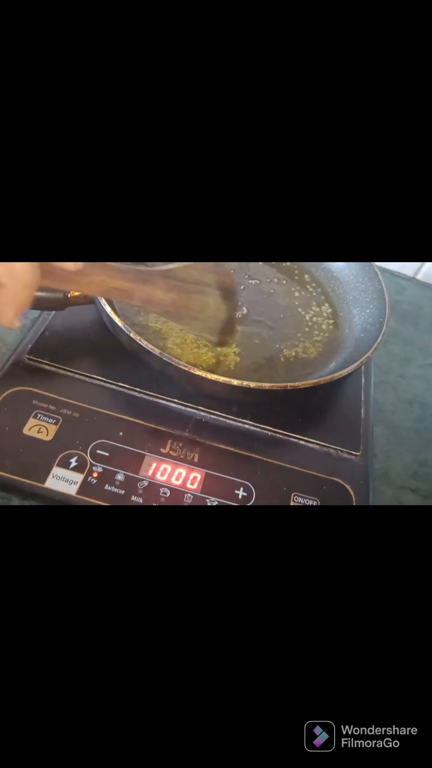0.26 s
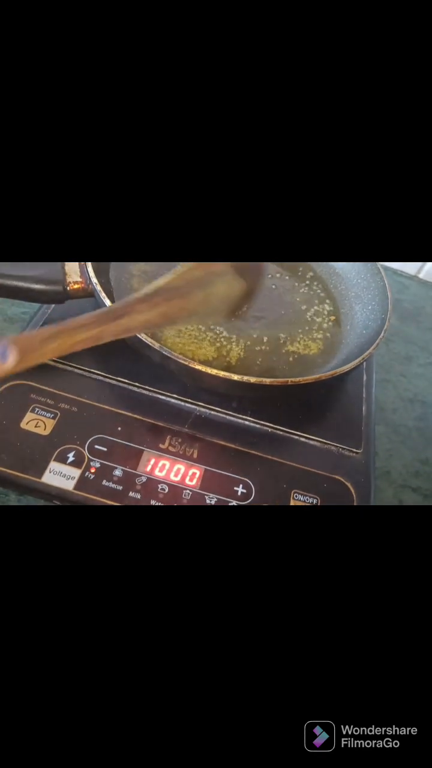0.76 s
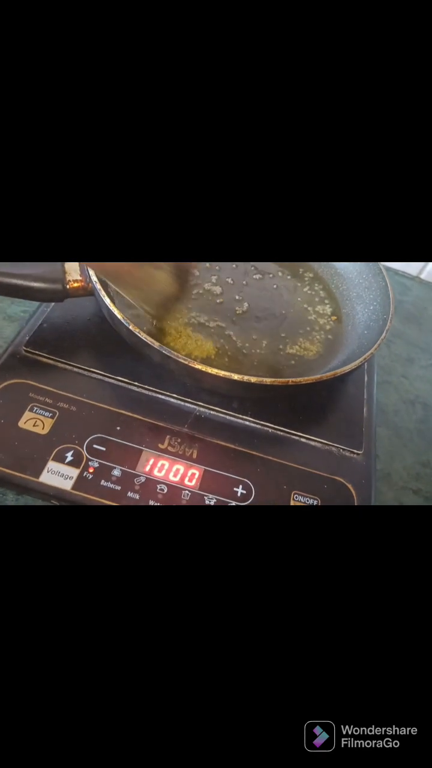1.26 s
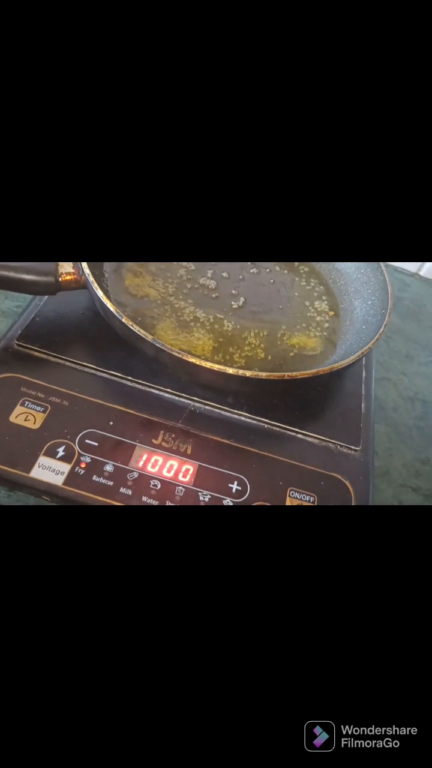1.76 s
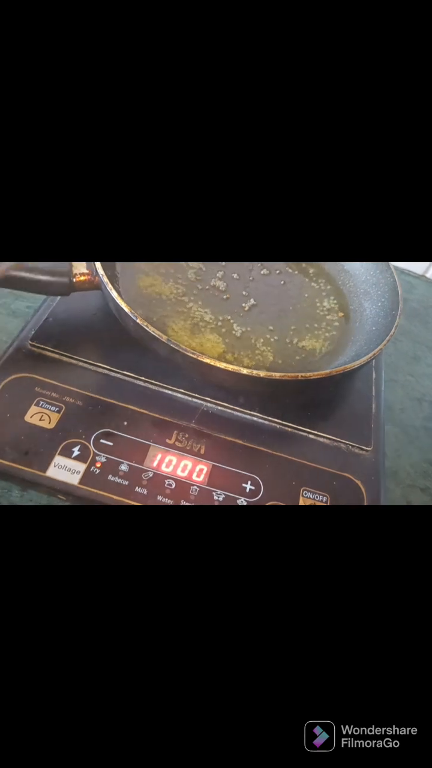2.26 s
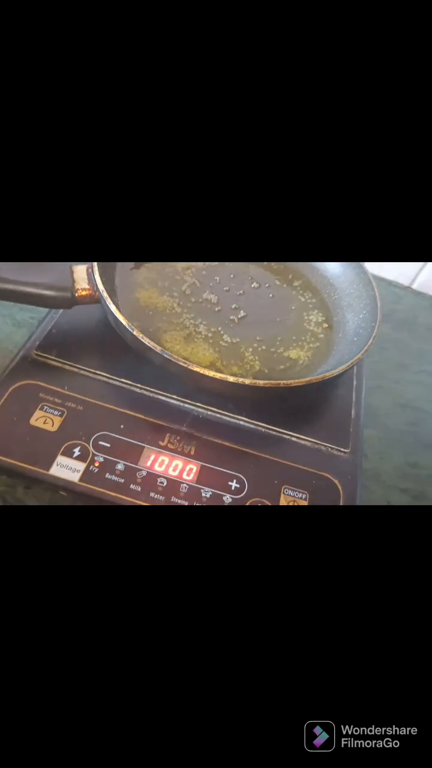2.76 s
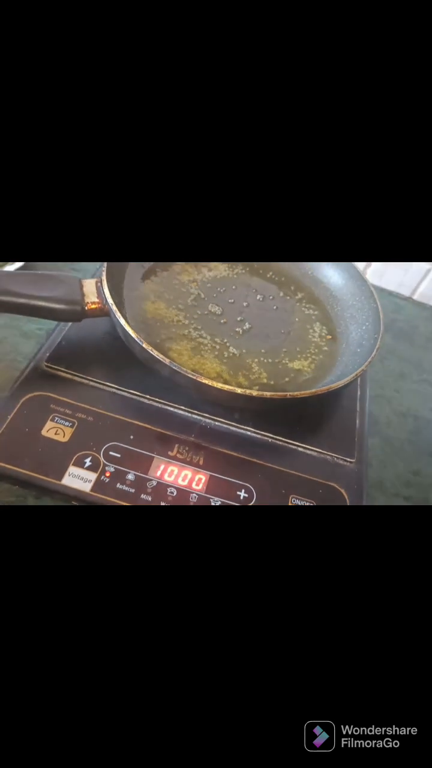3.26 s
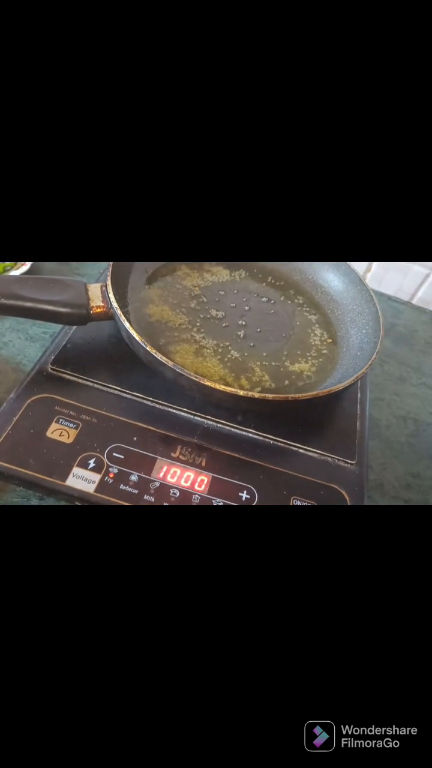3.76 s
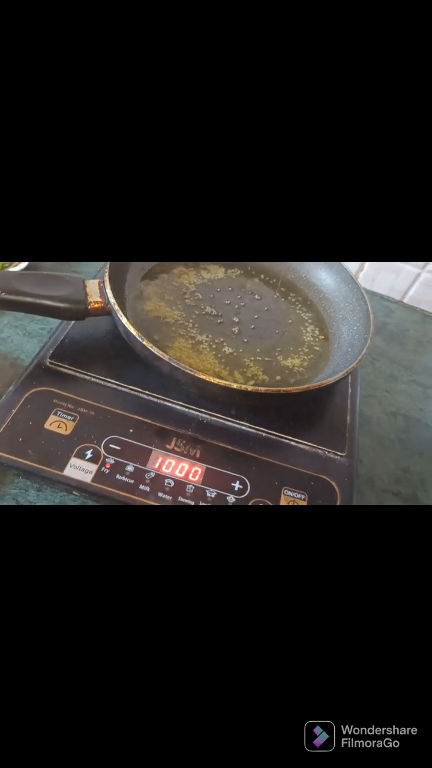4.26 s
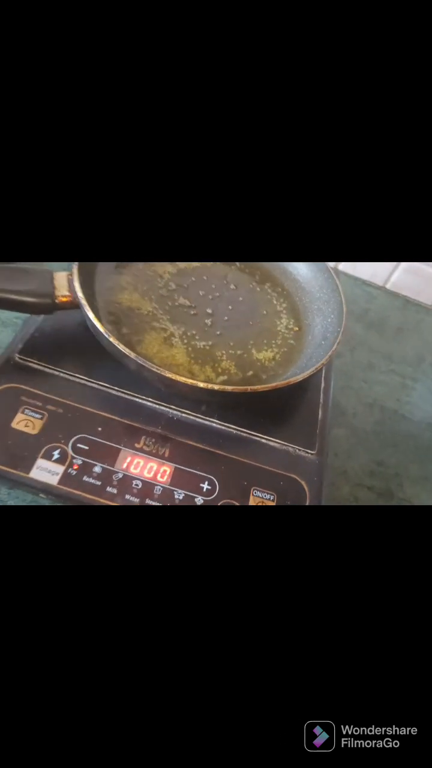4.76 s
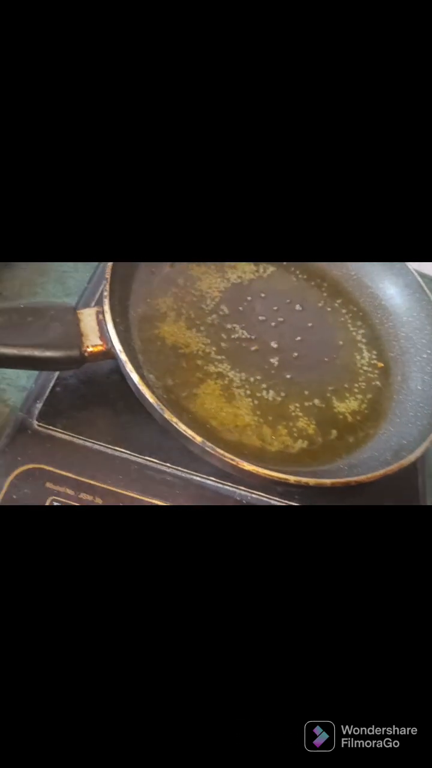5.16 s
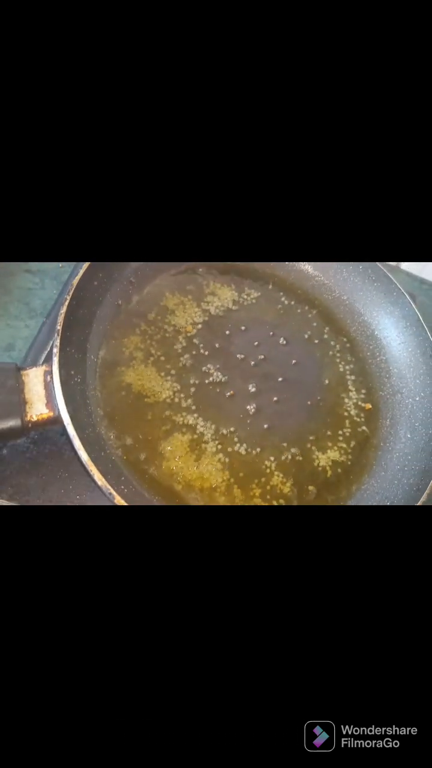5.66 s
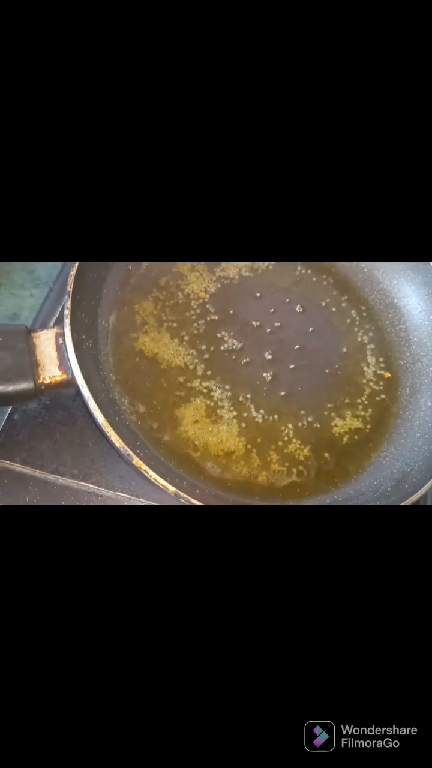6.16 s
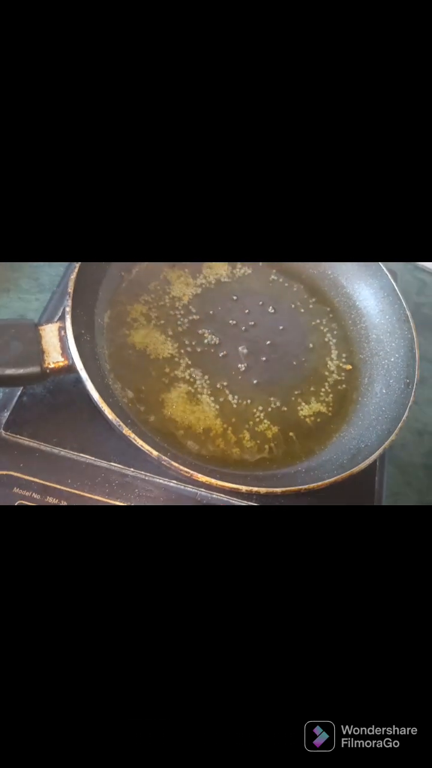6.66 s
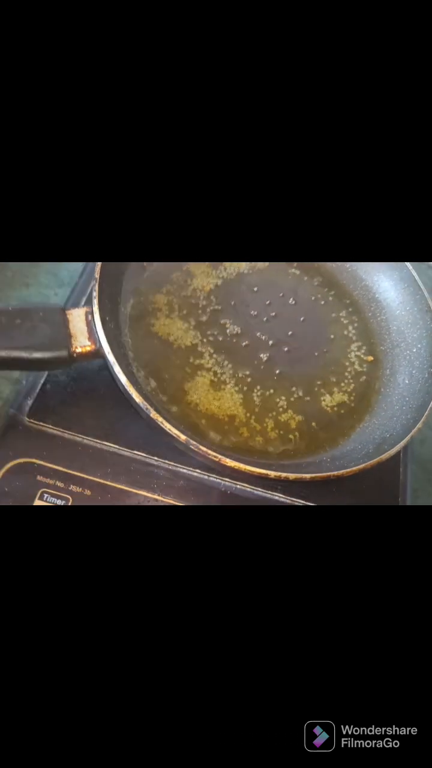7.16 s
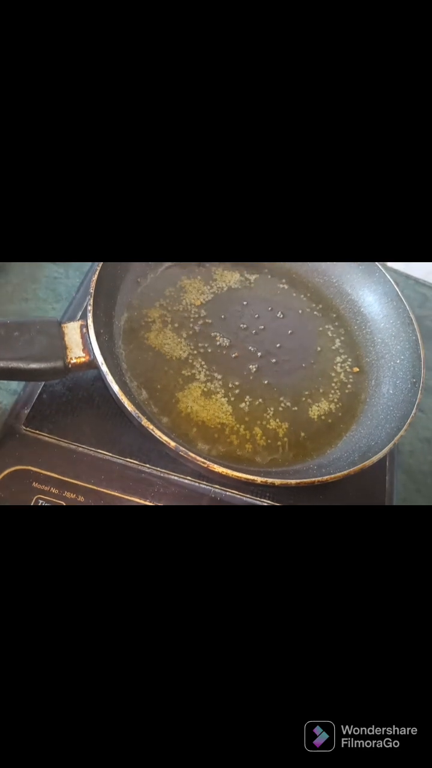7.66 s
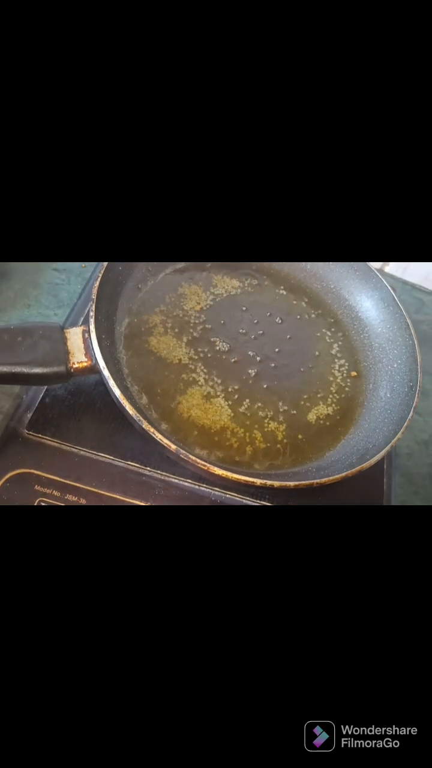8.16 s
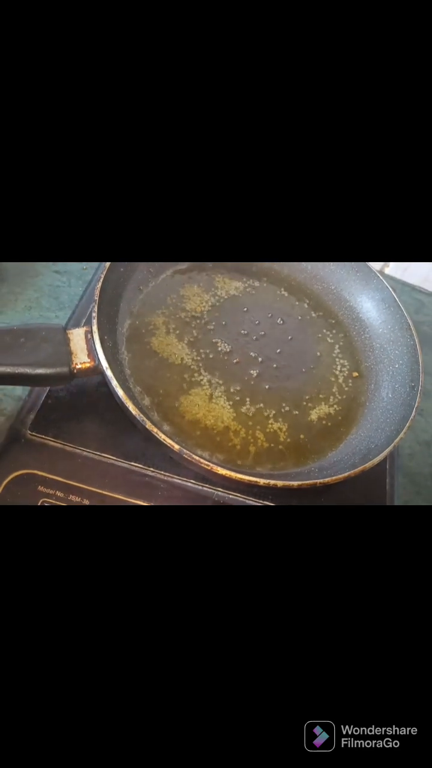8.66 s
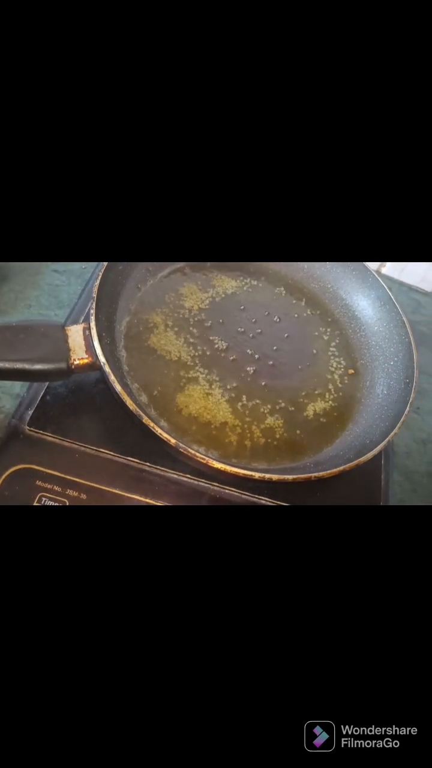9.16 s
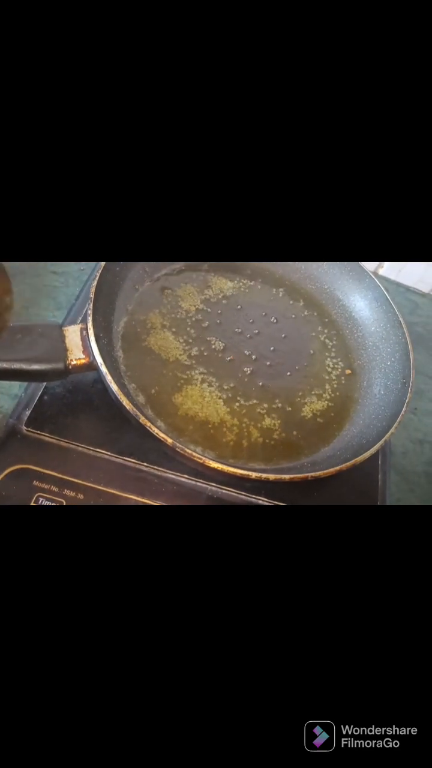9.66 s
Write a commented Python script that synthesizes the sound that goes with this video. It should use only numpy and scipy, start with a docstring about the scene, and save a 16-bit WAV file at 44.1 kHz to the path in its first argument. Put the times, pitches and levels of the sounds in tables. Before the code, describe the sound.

Wooden spatula knocks a frying pan, then seeds snap and pop sharply in fizzing hot oil over a cooktop fan's low whir.

```python
"""Seeds popping in hot oil

Small seeds pop in a frying pan on an induction cooktop, close to a phone in a kitchen: short damped cavity rings.
A wooden spatula knocks the pan at first, exciting decaying modes and a dead clack of filtered noise.
Then pops and pitched plinks take over, above a fizz of tiny random bursts and a fan of shaped noise and tones.
Some pops overload the microphone into soft thumps; hard walls return the pops and knocks as a short tail."""
import sys
import numpy as np
from scipy import signal
from scipy.fft import rfft, irfft
from scipy.io import wavfile

SR = 44100
rng = np.random.default_rng(int(sys.argv[2]) if len(sys.argv) > 2 else 0)


def output_pcm(signal):
    """Save a mono or channel-first signal as 16-bit PCM at the path in sys.argv[1].

    Samples are clipped to [-1, 1] before scaling.
    """
    pcm = np.clip(np.atleast_2d(signal).T, -1, 1) * 32767
    wavfile.write(sys.argv[1], SR, np.round(pcm).astype(np.int16))


N = 437472

# air through the cooktop's fan, relative spectrum: [f/Hz, density/dB per Hz]
FAN_AIR_SPECTRUM = [(12, -60), (20, -27.5), (134, -6.5), (168, -6), (228, -11), (255, -5.5), (399, -7),
                    (485, -0.5), (660, -9.5), (780, -7), (1330, -6.5), (2260, -18.5), (3070, -26.5),
                    (7730, -27.5), (16000, -34)]
# course of the fan's level; the air lies a fixed step above it: [t/s, level/dB]
FAN_LEVEL_COURSE = [(0, -50.5), (4.4, -51), (5.6, -49.5), (6.8, -50), (9.92, -50.5)]
# tones of the fan, at its mean level: [f/Hz, level/dB]
FAN_TONE_LINES = [(161.5, -72), (262, -60), (425.3, -60.5), (473.7, -65.5), (786, -66.5), (1044, -62.5)]
# tiny bubbles in the oil, energy of the weakest at each time: [t/s, level/dB]
FIZZ_COURSE = [(0, -41), (1.9, -42), (2.5, -34), (6.2, -33), (9.92, -39.5)]
# spatula blows: [t/s, relative level/dB, corner f/Hz of the excitation, contact time/s, place: floor 0 to rim 1]
SPATULA_BLOWS = [(0.225, -2.5, 322, 0.0062, 0.17), (0.261, -3, 330, 0.0079, 0.19),
                 (1.044, -3.5, 1540, 0.00053, 0), (1.3195, -0.5, 2650, 0.00049, 0.0094),
                 (1.633, -22.5, 1470, 0.00088, 0.97)]
# modes of the pan, relative levels: [f/Hz, struck on the floor/dB, struck on the rim/dB, t60/s]
PAN_MODES = [(290.7, -21, -5.5, 0.19), (341.4, -34, -4, 0.27), (767, -30, -8, 0.16), (860, -20, -6, 0.058),
             (1250, -11, -28, 0.063), (1300, -1, -4, 0.032), (1457, -28, -5, 0.22),
             (1900, -17.5, -36, 0.16), (1966, -22.5, -28, 0.44), (2100, -28, -34, 0.38),
             (2245, -14, -11, 0.053), (2650, -16, -30, 0.02)]
# dead clack of the wood, relative spectrum: [f/Hz, density/dB per Hz]
WOOD_SPECTRUM = [(100, -41), (300, -17), (550, -9.5), (800, -11.5), (1270, -1), (1650, 0), (2000, 7.5),
                 (2650, -4), (3300, -21), (4600, -5.5), (9000, -16.5)]
# decay of the kitchen: [f/Hz, t60/s]
KITCHEN_DECAY = [(250, 0.3), (2000, 0.33), (5000, 0.29), (9000, 0.31), (15000, 0.25)]
# seeds that burst with a dry snap, before the spread between channels: [t/s, energy level/dB, f/Hz]
SEED_POPS = [(.2553, -1, 13900), (1.1023, -13, 5330), (1.121, -7, 3480), (1.4129, -12.5, 9600),
             (1.4596, -11.5, 4570), (2.2437, -18.5, 13500), (2.421, -17.5, 11900), (2.5921, -7.5, 14200),
             (2.6308, 1.3, 10700), (2.7804, .7, 14100), (2.8613, 3, 13600), (3.1149, -5, 12300),
             (3.31, -8, 11500), (3.33, -1.5, 10000), (3.4234, -1.5, 10500), (3.4513, -6, 13900),
             (3.5336, -1.5, 9500), (3.617, 3, 12500), (3.6907, 0.5, 9700), (3.8242, 1.8, 9300),
             (3.953, -1.5, 12800), (4.091, -6.5, 9500), (4.2086, -7, 9650), (4.2285, -1.5, 11900),
             (4.3291, -13.5, 12000), (4.814, 0, 8750), (5.1267, -7, 11100), (5.166, -1, 10200),
             (5.324, -5.5, 7500), (5.5025, -16, 14000), (5.7689, 1, 11900), (5.8424, 4.5, 10500),
             (5.9915, -7, 6730), (6.089, -2.5, 10000), (6.2204, -16, 5500), (6.3801, -4, 9300),
             (6.4309, -7, 14000), (6.5686, -1.5, 11500), (6.8282, -12.5, 11500), (7.0892, -3, 10600),
             (7.4223, 3, 10200), (7.5584, -3, 13000), (7.5799, 0, 12600), (7.9094, -11, 10400),
             (8.2215, .5, 12100), (8.3194, -5.5, 8000), (8.4588, -15.5, 11400), (8.6483, -1.5, 10100),
             (8.7675, 2, 8550), (8.9095, -8, 12000), (9.138, -18, 5060), (9.3959, -6.5, 8600),
             (9.6192, -5.5, 4400), (9.656, -17, 4040), (9.6686, 4.5, 9900), (9.8483, -15.5, 9800)]
# overloads, nominal sizes: [t/s, spike/full scale, bias jump left/full scale, bias jump right/full scale]
OVERLOADS = [(0.2563, 0.056, 0, 0.053), (2.7802, 0.042, 0.0037, 0.074), (2.8613, .15, .077, 0.15),
             (3.533, .36, 0.06, 0.61), (3.6915, 0.39, 0.12, 0.15), (4.2266, 0.03, 0.0084, 0.029),
             (5.8425, 0.12, 0.037, .009), (6.3811, -.36, -.42, 0.2), (6.5675, -0.022, 0.012, -0.13),
             (7.4223, 0.099, .003, .012), (7.5795, 0.033, 0.023, 0.012)]
# steam bubbles that ring with a short plink: [t/s, relative energy level/dB, f/Hz]
STEAM_BUBBLES = [(2.395, -15.5, 7400), (3.2495, -5, 4420), (4.289, -15.5, 2650), (4.3, -12.5, 5850),
                 (7.115, -4, 4770), (7.9989, -6.5, 5300), (8.1217, -4, 3100), (9.2288, -13.5, 3960),
                 (9.2411, -12.5, 4970), (9.5727, -2.5, 2840)]
# colour of each microphone port: [f/Hz, level/dB]
LEFT_PORT = [(2500, -1), (4300, -3.5), (5200, -1.5), (6700, -13.5), (8000, -2), (8800, 7.5), (9800, 7),
             (11000, -2.5), (12500, 3), (14000, -15), (15500, 4)]
RIGHT_PORT = [(2500, -2), (4500, 2), (6000, 1.5), (7500, 6.5), (8500, 5.5), (10200, -13), (11500, -3),
              (12600, 3.5), (14000, 4), (15500, 5)]
# correlation of the two ports in a diffuse field: [f/Hz, likeness 0 to 1]
PORT_LIKENESS = [(50, 0.94), (300, 0.86), (700, 0.65), (1400, 0), (3000, 0), (16000, 0)]

EDGE_HZ = 15950  # upper limit of the band
# sharpness Q of a seed's snap, and its scatter from seed to seed
SNAP_Q, SNAP_Q_SPREAD = 0.69, 0.081
# splits of the husk: level against the snap (dB), latest delay (s), sharpness Q, pitch scatter (octaves)
SPLIT_DB, SPLIT_S, SPLIT_Q, SPLIT_OCTAVES = -10, .0022, 1.9, 0.51
# ring of a bubble: sharpness Q; tick of its breaking skin (dB against the ring, Hz)
BUBBLE_Q, SKIN_DB, SKIN_HZ = 3.3, -17, 5800
HOT_S = 6.9  # from here on the oil is hot enough for the smaller seeds as well


def amp(db):
    """Level law: twenty decibels are a tenfold amplitude."""
    return 10 ** (np.asarray(db) / 20)


def evened(x):
    """Power normalisation: scales to an rms of one."""
    return x / np.sqrt(np.mean(x ** 2) + 1e-20)


def unit(x):
    """Energy normalisation: scales each channel to an energy of one."""
    return x / np.linalg.norm(x, axis=-1, keepdims=True)


def read(points, hz):
    """Interpolation: reads a table on a log-frequency axis."""
    f, value = np.transpose(points)
    return np.interp(np.log(hz + 1), np.log(f + 1), value)


def add(mix, s, sound):
    """Superposition: mixes a sound in at time s, channel by channel."""
    part = mix[:, max(round(s * SR), 0):][:, :sound.shape[-1]]
    part += sound[..., :part.shape[1]]


def bins(size):
    """Discrete spectrum: frequencies in Hz for this many samples."""
    return np.fft.rfftfreq(size, 1 / SR)


def causal(gain):
    """Minimum phase: folding the cepstrum gives the most sudden response with this spectrum."""
    cepstrum = irfft(np.log(np.maximum(gain, 1e-5)))
    half = len(cepstrum) // 2
    cepstrum[1:half] *= 2
    cepstrum[half + 1:] = 0
    return irfft(np.exp(rfft(cepstrum)))


def convolve(x, response):
    """Linear filtering: convolves each channel and keeps the length."""
    return signal.fftconvolve(np.atleast_2d(x), np.atleast_2d(response), axes=1)[:, :x.shape[-1]]


def diffuse(size):
    """Diffuse-field coherence: noise alike at both ports in the bass, unrelated in the treble."""
    a, b = rfft(rng.standard_normal((2, size)))
    same = np.clip(read(PORT_LIKENESS, bins(size)), 0, 1)
    return irfft([a, same * a + np.sqrt(1 - same ** 2) * b], size)


def fan(air_db=2, waver_hz=6, waver=0.74):
    """Flow noise and tones: shaped broadband air with wavering lines, louder as the microphone comes near."""
    t = np.arange(N) / SR
    s, db = np.transpose(FAN_LEVEL_COURSE)
    spectrum = amp(read(FAN_AIR_SPECTRUM, bins(N)))
    air = evened(irfft(rfft(diffuse(N)) * spectrum, N))
    tones = np.zeros(N)
    for hz, tone_db in FAN_TONE_LINES:
        # each line mixes narrow-band noise with a steady sine
        narrow_band = 1 / (1 + ((bins(N) - hz) / waver_hz) ** 2)
        drift = evened(irfft(rfft(rng.standard_normal(N)) * narrow_band, N))
        steady = np.sin(2 * np.pi * hz * t)
        tones += amp(tone_db) * evened(waver * drift + (1 - waver) * steady)
    course = amp(np.interp(t, s, db) - db.mean())
    return course * (amp(air_db + db.mean()) * air + tones)


def burst(hz, q, snap=0.31, scatter_db=-4.0, scatter_t60=0.023, tear_db=-13, tear_s=0.0014, order=128, size=1024):
    """Damped resonance: a cavity rings a few cycles. Rows: left port, right port, out into the room."""
    u = bins(size) / hz
    t = (np.arange(size) - order) / SR  # the snap comes at sample "order"
    ring = causal(u / ((1 - u ** 2) ** 2 + (u / max(q, .4)) ** 2))
    # the hull tears just before the snap, and the pan's wall scatters it just after
    grit = rng.standard_normal((2, size))
    tear = grit * np.exp(-abs(t) / tear_s) * (t < 0)
    scatter = grit * amp(-60 * abs(t) / scatter_t60) * (t > 0)
    paths = amp(tear_db) * unit(tear) + amp(scatter_db) * unit(scatter)
    # the snap reaches the left port a few samples before the right, then again off the pan's floor
    paths[0, order] += 1
    paths[1, order + rng.integers(3, 6)] += 1
    paths[:, order + rng.integers(8, 30)] += snap
    near = convolve(paths, ring)
    # the room hears the pop from all sides, so less of the pan's colour is left in it
    room = np.roll(ring, order) + near[0]
    return unit(np.vstack([near, room]))


def fizz(per_s=36, spread_db=2.0, count=14):
    """Poisson process: tiny bubbles of many sizes burst at random, most of them barely heard."""
    out = np.zeros((3, N))
    level = amp(np.interp(np.arange(N) / SR, *np.transpose(FIZZ_COURSE)))
    for hz in np.geomspace(4200, 13500, count):
        strength = amp(spread_db * np.minimum(rng.exponential(1, N), 3.5))
        moments = rng.random(N) < per_s / count / SR
        out += convolve(level * strength * moments, burst(hz, q=2.9))
    return out


def knocks(ring_db=-5, wood_db=-8, wood_t60=0.043, size=22050):
    """Modal excitation: each blow clacks the wood and rings the pan; soft blows reach only the low modes."""
    out = np.zeros((2, N))
    t, f = np.arange(size) / SR, bins(size)
    for s, db, top_hz, contact, rim in SPATULA_BLOWS:
        ring = 0
        for hz, floor_db, rim_db, t60 in PAN_MODES:
            decay = amp(np.interp(rim, [0, 1], [floor_db, rim_db]) - 60 * t / t60)
            # a random phase, slightly different at the two ports
            cycles = hz * t + rng.random()
            ring = ring + decay * np.sin(2 * np.pi * cycles + rng.normal(0, 0.47, (2, 1)))
        wood = convolve(diffuse(size), causal(amp(read(WOOD_SPECTRUM, f))))
        clack = evened(wood) * amp(-60 * t / wood_t60)
        onset = 1 - np.exp(-t / contact)
        blow = (amp(ring_db) * ring + amp(wood_db) * clack) * onset
        softness = causal(1 / np.hypot(1, (f / top_hz) ** 2))
        add(out, s, amp(db) * convolve(blow, softness))
    return out


def kitchen(x, tail_db=-6.5, first_s=0.006, echo_db=-21, count=3, size=22050):
    """Reverberation: a tail swells and dies, with echoes off two near walls; three tails take turns."""
    t, out = np.arange(size) / SR, np.zeros((2, N))
    swell = 1 - np.exp(-np.maximum(t - first_s, 0) / .005)
    for k in range(count):
        # each band of the noise decays at its own rate
        hz, at, z = signal.stft(diffuse(size), SR, nperseg=256)
        decay = amp(-60 * at / read(KITCHEN_DECAY, hz)[:, None])
        tail = signal.istft(z * decay, SR)[1][:, :size]
        response = amp(tail_db) * unit(tail * swell)
        for delay in (.0118, .0164):
            add(response, delay, amp(echo_db) * np.ones((2, 1)))
        # sound of each seventh of a second excites the next tail
        turn = np.arange(N) * 7 // SR % count == k
        out += convolve(x * turn, response)
    return out


def pops(pan_spread_db=3.0, spatter_db=-22, spatter_spread_db=0.5, flight_s=.08, order=128, count=3):
    """Sudden cavity release: a snap, two quick splits of the husk, and flung drops that spit as they land."""
    out = np.zeros((3, N))
    for s, db, hz in SEED_POPS:
        start = s - order / SR
        q = SNAP_Q + SNAP_Q_SPREAD * rng.uniform(-0.93, 1)
        side_db = pan_spread_db * (2 * rng.random() - 1) * np.array([[1], [-1], [0]])
        add(out, start, amp(db + side_db) * burst(hz, q, order=order))
        for k, (moment, pitch) in enumerate(rng.random((2, 2))):
            split_hz = hz * 2 ** (SPLIT_OCTAVES * (2 * pitch - 1))
            delay = SPLIT_S * (k + (1 + moment) / 2) / 2
            gain = amp(db + side_db + SPLIT_DB) / (k + 1)  # the second split is half as strong
            add(out, start + delay, gain * burst(split_hz, SPLIT_Q, order=order))
        for flight, drop_size, drop_pitch in rng.random((count, 3)):
            drop_db = db + spatter_db + spatter_spread_db * (2 * drop_size - 1)
            drop = burst(hz * (1 + drop_pitch) / 2, q + .5, order=order)
            add(out, start + flight * flight_s, amp(drop_db) * drop)
    return out


def thumps(spike_s=0.00018, leak_s=0.013, corner_hz=23, size=8192):
    """Overload recovery: a steep front jolts the microphone's bias, which swings back through the bass cut."""
    out, t = np.zeros((2, N)), np.arange(size) / SR
    jump = np.exp(-t / leak_s) * (1 - np.exp(-2 * t / spike_s))
    bass_cut = signal.butter(4, corner_hz, "hp", fs=SR, output="sos")
    swing = signal.sosfilt(bass_cut, jump)
    lead = 4 * spike_s  # room for the rise of the spike
    u = (t - lead) / spike_s
    spike = (1 - u ** 2) * np.exp(-u ** 2 / 2)
    for s, front, left, right in OVERLOADS:
        add(out, s - lead, front * spike)
        add(out, s, np.array([[left], [right]]) * swing)
    return out


def bubbles(room_db=-3.0, order=128):
    """Cavity resonance: a skin breaks with a tick and the open bubble rings; low in the pan, the room gets less."""
    out = np.zeros((3, N))
    for s, db, hz in STEAM_BUBBLES:
        ring = burst(hz, BUBBLE_Q, order=order)
        tick = amp(SKIN_DB) * burst(SKIN_HZ, SNAP_Q, order=order)
        add(out, s - order / SR, amp(db) * (ring + tick))
    return np.vstack([out[:2], amp(room_db) * out[2]])


def faint_pops(level_db=-20, spread_db=7.0, low_hz=4500, high_hz=13000, q=1.2, count=10):
    """Stratified random events: smaller seeds go off one per equal gap, with random moment, size and pitch."""
    out = np.zeros((3, N))
    gap_s = (N / SR - HOT_S) / count
    for k, (moment, strength, pitch) in enumerate(rng.random((count, 3))):
        hz = low_hz + (high_hz - low_hz) * pitch
        db = level_db + spread_db * (2 * strength - 2)  # level_db is the loudest
        add(out, HOT_S + (k + moment) * gap_s, amp(db) * burst(hz, q))
    return out


def scene():
    """Superposition: the pan and its echoes as each port colours them, with the thumps and the fan."""
    oil = pops() + bubbles() + faint_pops() + fizz()
    pan = knocks()
    sound = oil[:2] + pan + kitchen(oil[2] + pan)
    ports = np.array([causal(amp(read(port, bins(size=1024)))) for port in (LEFT_PORT, RIGHT_PORT)])
    return convolve(sound, ports) + thumps() + fan()


def record(dry):
    """Saturation, then band limiting: the loudest peaks are rounded off and the top is cut."""
    low_pass = signal.firwin(255, EDGE_HZ, window=("kaiser", 9), fs=SR)
    return signal.oaconvolve(np.tanh(dry), low_pass[None], "same")


dry = scene()
out = record(dry)
output_pcm(out)
```